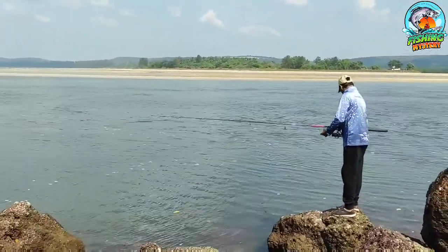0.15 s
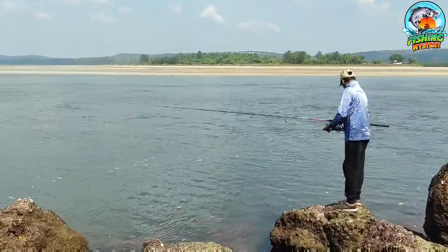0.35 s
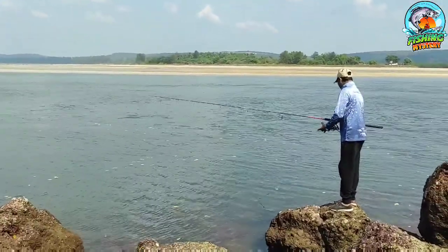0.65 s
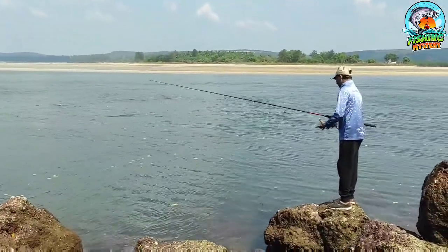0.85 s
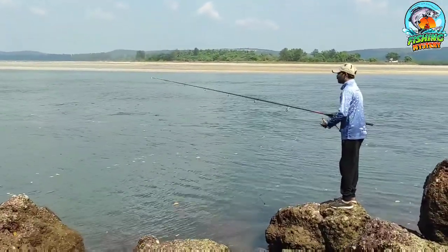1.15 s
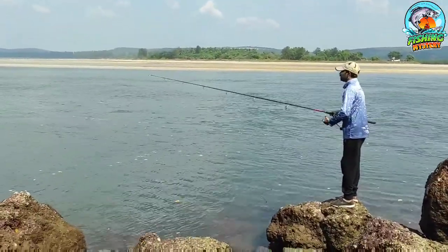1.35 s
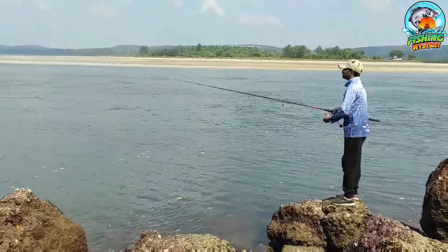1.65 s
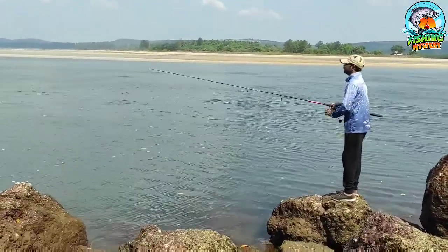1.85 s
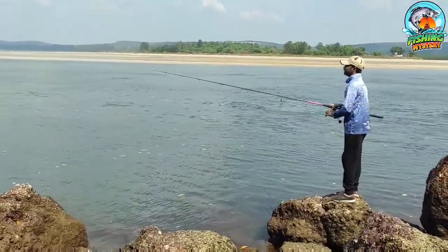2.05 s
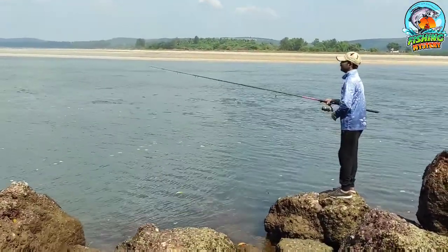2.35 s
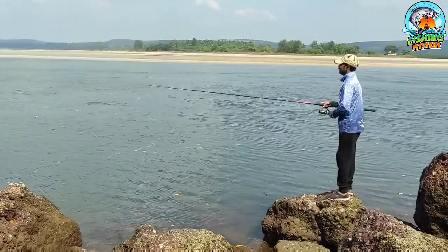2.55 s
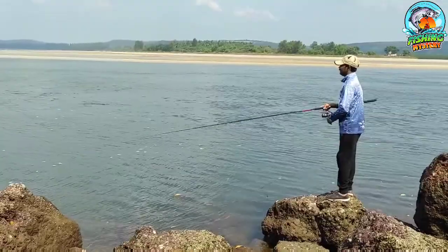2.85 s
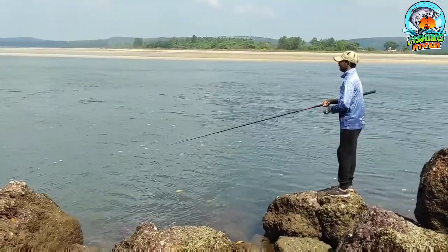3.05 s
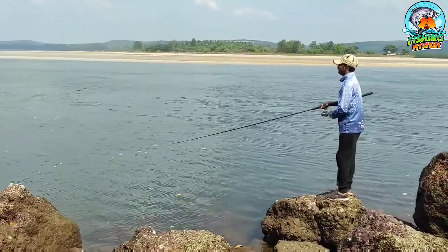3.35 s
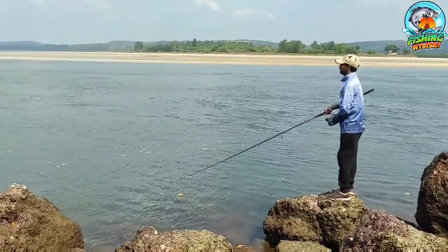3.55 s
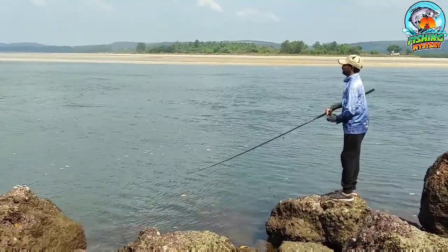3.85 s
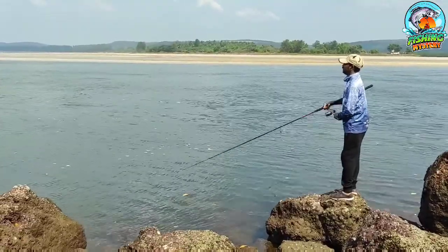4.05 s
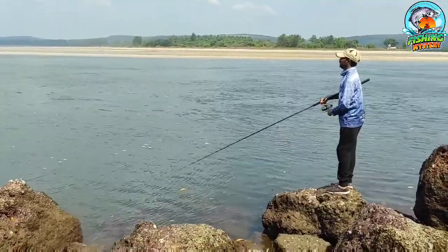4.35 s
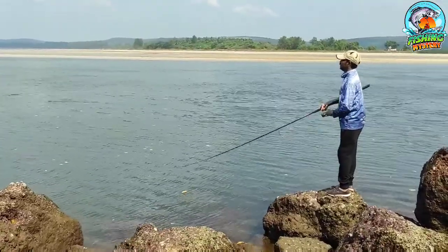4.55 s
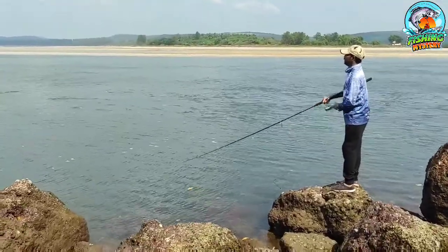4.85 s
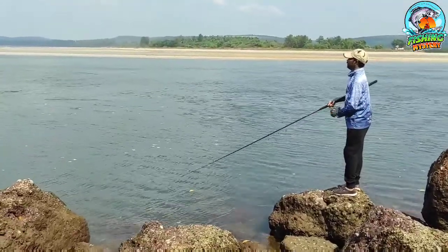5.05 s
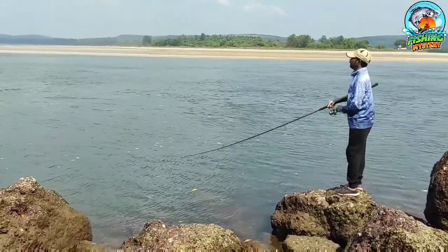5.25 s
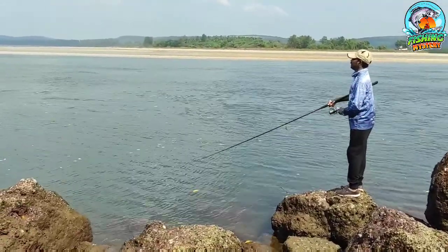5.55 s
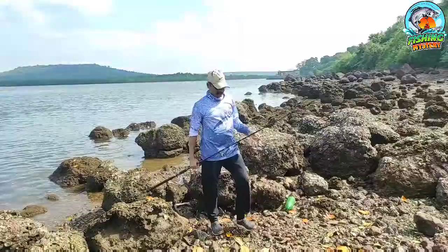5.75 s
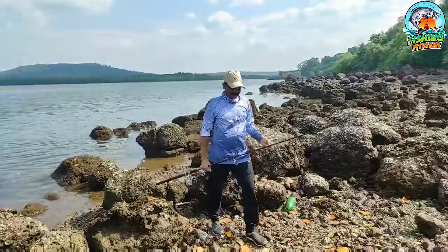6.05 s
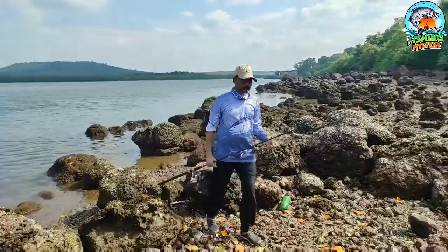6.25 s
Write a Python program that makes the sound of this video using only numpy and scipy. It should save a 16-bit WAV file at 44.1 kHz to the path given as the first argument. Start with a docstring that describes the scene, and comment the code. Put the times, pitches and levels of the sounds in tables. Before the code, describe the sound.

Low wind buffets the microphone on a rocky shore as a bird whistles upward repeatedly; the sound cuts, returns windier, and stones crunch underfoot.

```python
"""Rocky shore in wind: a near bird's rising whistles, most ending in a short pip, echo off the rocks.
A far bird gives falling notes. Birds are gliding sines; tackle clicks are noise bursts ringing in bands.
Wind pushing on the microphone, lapping water and hiss are coloured noise.
Near the end the sound breaks off with sharp ticks and fades back in with stronger wind;
steps then crunch on shingle as bursts of grainy noise."""
import sys
import numpy as np
from scipy import signal
from scipy.fft import rfft, irfft, next_fast_len
from scipy.io import wavfile
from scipy.ndimage import uniform_filter1d, map_coordinates

SR = 44100
rng = np.random.default_rng(int(sys.argv[2]) if len(sys.argv) > 2 else 0)


def unload_wav(signal):
    """Save mono or channel-first audio to the path in sys.argv[1] as 16-bit WAV at rate SR, clipped to [-1, 1]."""
    wavfile.write(
        sys.argv[1],
        SR,
        np.round(np.clip(np.atleast_2d(signal).T, -1, 1) * 32767).astype(np.int16),
    )


N = 282226

# Source levels apply ahead of the break gain. Spectra are relative: each noise is scaled to rms 1.
# Wind on the diaphragm: (time [s], push level before random swing [dB], buffet level [dB])
WIND_LEVELS = [(0, -36, -51), (.12, -34, -56), (.45, -43, -54), (.75, -50, -57), (1.0, -40, -58.5),
               (1.45, -50, -57.5), (1.85, -36, -55.5), (2.03, -46, -55), (2.28, -38, -53.5),
               (2.6, -43, -57), (3.0, -42, -55.5), (3.35, -48, -55), (3.7, -39, -52.5), (4.15, -37, -56.5),
               (4.75, -43, -52), (5.0, -38, -53.5), (5.36, -42, -54.5), (5.51, -32, -53), (5.73, -42, -52),
               (5.83, -38, -50), (5.842, -19, -31), (5.875, -20, -38), (5.91, -17, -34), (5.96, -27, -36),
               (6.015, -19, -35), (6.1, -22, -43), (6.164, -26, -41), (6.274, -20, -42.5), (6.39, -27, -42)]
# Push and buffet spectra: (frequency [Hz], relative density [dB per Hz])
PUSH_SPECTRUM = [(1, 1), (3, 14), (10, 9), (20, 0.5), (30, -29.5), (50, -74), (100, -100)]
BUFFET_SPECTRUM = [(12, -22.5), (22, 4.5), (50, -10.5), (100, -20), (200, -32), (400, -46), (800, -68)]
PUSH_SWING_DB = 2  # scales the random swing

# Water: (time [s], wash level before 2 dB cut [dB], lapping level before swell [dB], fizz level before swell [dB])
WATER_LEVELS = [(0, -61, -72, -80), (.2, -61, -71.5, -83.5), (2, -61, -70, -82), (3.4, -61, -69, -80),
                (4.6, -61, -69.5, -81), (4.91, -59.5, -67.5, -80.5), (5.5, -62, -70, -81),
                (5.73, -61, -68.5, -77), (5.912, -64, -70, -78.5), (6.034, -56.5, -65.5, -75),
                (6.302, -57.5, -63, -71.5), (6.38, -61.5, -64.5, -73)]
# Wash, lapping and fizz spectra: (frequency [Hz], relative density [dB per Hz])
WASH_SPECTRUM = [(100, -7.5), (180, -6), (260, 0.5), (450, 0.5), (700, -1), (1000, -8), (1500, -14),
                 (2500, -63)]
LAPPING_SPECTRUM = [(900, -5.5), (1500, -4), (2100, 2), (3000, -1.5), (3700, -1), (4300, -14.5),
                    (5000, -40.5), (6000, -44)]
FIZZ_SPECTRUM = [(3500, -15.5), (4800, -6.5), (6200, -6.5), (7200, -10.5), (8500, -11.5), (10000, -21),
                 (12000, -43)]

# Microphone self-noise: (frequency [Hz], relative density [dB per Hz])
HISS_SPECTRUM = [(3000, -38), (5000, -8), (8000, -4), (11000, 1.5), (16000, -1)]
# Hiss, louder after the break: (time [s], level [dB])
HISS_LEVELS = [(5.8, -84), (5.95, -81), (6.1, -77.5), (6.4, -79)]

# Clear tackle clicks: (time [s], upper ring peak [dB], upper ring pitch [Hz],
# lower ring before 1.5 dB cut [dB re upper], bright ring before 1.5 dB lift [dB re upper], 30 dB decay [s])
CLEAR_CLICKS = [(0.0364, -47.5, 5740, -5.5, -26, 0.011), (0.043, -55, 6100, 1.5, -26, 0.016),
                (0.5147, -63, 6250, -7, -18, 0.007), (1.7394, -61, 6050, -15, -4, 0.0077),
                (1.7504, -59, 6120, -9, -3, 0.007), (1.761, -62, 5800, -7, -32, 0.0079),
                (1.837, -64, 6170, 7, 4, 0.007), (1.8826, -54.5, 5630, -3, -27, 0.0081),
                (1.9969, -58, 6800, -13, -19, 0.0063), (2.0188, -51.5, 6550, 1, -5, 0.0054),
                (2.1004, -53, 6500, 0, -5, 0.012), (2.2094, -63, 6180, -10, -13, 0.007),
                (2.219, -63, 6200, -10, -6, 0.007), (2.5511, -55, 5400, -15, -29, 0.007),
                (2.72, -56, 7000, -24, -13, 0.0048), (2.9636, -52, 6300, 1, -8, 0.014),
                (2.9735, -52, 6250, 0, -10, 0.014), (3.033, -63, 6120, 5, -13, 0.008),
                (3.5698, -62, 6200, -3, -16, 0.007), (4.4608, -64, 5920, 0, -20, 0.007),
                (4.838, -68, 7000, -10, -5, 0.006), (5.0439, -63, 5900, -8, -11, 0.007),
                (5.128, -66, 6200, -10, -10, 0.007), (5.3223, -64, 6200, -4, -19, 0.0085),
                (5.3672, -57, 5400, -8, -22, 0.0058), (6.1214, -56, 5800, -4, -10, 0.005),
                (6.231, -58, 5700, -8, -10, 0.007), (6.292, -59, 10700, -8, -8, 0.009)]
# Faint clicks, one row each for upper peak [dB], upper pitch [Hz], lower ring [dB], bright ring [dB],
# with the same cut and lift: (mean, standard deviation)
FAINT_CLICK_STATS = [(-72, 2.5), (6200, 280), (-6, 4), (-15, 4)]
FAINT_COUNT, FAINT_UNTIL_S, FAINT_DECAY_S = 24, 5.7, 0.007
CLICK_RISE = 0.2  # rise time constant / decay length
BODY_HZ, BODY_DB = 2150, -7  # dull ring, dB re lower-ring table value

# Near bird's whistles, one list each: (time [s], pitch before end flick [Hz], level before flick and waver [dB])
WHISTLE_GLIDES = [
    [(0.703, 4216, -85), (0.711, 4360, -71), (0.723, 4555, -69), (0.739, 4697, -70), (0.849, 4975, -68),
     (0.901, 5072, -60), (0.955, 5080, -61), (1.003, 5217, -59), (1.01, 5289, -65)],
    [(1.503, 4403, -78), (1.509, 4401, -69), (1.535, 4730, -73), (1.587, 4917, -73), (1.611, 4943, -85),
     (1.659, 5117, -63), (1.695, 5235, -60), (1.735, 5250, -60), (1.775, 5327, -57), (1.782, 5366, -65)],
    [(2.289, 4164, -87), (2.295, 4372, -71), (2.307, 4580, -66), (2.331, 4792, -67), (2.389, 4968, -71),
     (2.435, 5078, -65), (2.517, 5223, -60), (2.549, 5311, -52), (2.557, 5341, -59)],
    [(3.595, 4378, -78), (3.605, 4558, -70), (3.629, 4775, -66), (3.691, 4976, -69), (3.751, 5096, -60),
     (3.839, 5196, -58), (3.879, 5319, -54), (3.886, 5344, -61)],
    [(4.875, 4298, -78), (4.885, 4468, -71), (4.915, 4768, -85), (4.933, 4841, -71), (4.967, 4944, -65),
     (5.011, 5053, -66), (5.161, 5177, -53), (5.168, 5182, -59)],
]
# Closing pips: (time [s], fundamental peak [dB], mid-pip pitch [Hz], overtone [dB re fundamental])
CLOSING_PIPS = [(1.012, -57, 3650, -13), (1.781, -62, 3680, -20), (2.557, -56, 3600, -14),
                (3.886, -54, 3650, -12)]
# Octave of each whistle, at the whistle's peak: (level before waver [dB])
OCTAVE_LEVELS_DB = [-91, -93, -84, -86, -89]
OCTAVE_FOLLOW_DB_PER_DB, OCTAVE_WAVER_DB = 0.35, 3
WHISTLE_WAVER_DB = 1.2
FLICK_HZ, FLICK_S, FLICK_DB = 170, 0.003, 3  # upward snap over the last milliseconds

# Scattering shore, then three rock faces: (delay [s], return level [dB], t60 [s], scattered energy share [0-1])
ROCK_RETURNS = [(.02, -19, .55, 1), (.13, -14.5, .09, .6), (.17, -23, .1, .7), (.25, -29, .08, .55)]
# Each whistle reaches the rocks differently as the bird turns its head: (send gain [dB])
ECHO_SEND_DB = [0, 0, -1, -2, -4]

# Far bird: (time [s], length [s], start pitch [Hz], end pitch [Hz], level before offsets [dB], start offset [dB])
FALLING_NOTES = [(1.515, .185, 4430, 3120, -70.5, -7), (3.15, .165, 4300, 3185, -69.5, -14),
                 (3.603, .028, 6800, 5950, -70, -10), (6.18, .08, 3100, 2290, -66.5, 2)]
SETTLE_POWER, END_OFFSET_DB = 2.05, -3  # how sharply the glide levels off; level offset at the end
FAR_FLUTTER_DB = 1.8  # scale; the long path breaks up the far notes

# Ticks around the break: (time [s], jump size before 4.5 dB lift [dB])
BREAK_TICKS = [(5.7407, -39.5), (5.8537, -40), (5.8584, -63), (5.8642, -43.5), (5.8735, -63), (5.8848, -60),
               (5.8932, -46.5), (5.9033, -53), (5.9119, -46), (5.924, -46)]
# Break and fade back in: (time [s], gain [dB])
BREAK_GAIN = [(5.7405, 3.5), (5.7415, -77), (5.78, -20.5), (5.828, -14), (5.84, -4), (5.9, -3), (5.96, -2)]

# Shingle crunches: (time [s], level before onset rise [dB], 30 dB decay [s], treble gain [dB])
CRUNCHES = [(6.107, -55, 0.02, -8), (6.1345, -43, 0.014, -2), (6.143, -50, 0.015, -4),
            (6.1685, -41.5, 0.025, -3), (6.176, -47, 0.02, -4), (6.185, -51, 0.02, -10),
            (6.196, -53, 0.02, -10), (6.26, -55, 0.03, -8), (6.309, -42, 0.012, 1), (6.319, -55, 0.012, -2),
            (6.351, -46, 0.02, -10), (6.282, -53, 0.012, -6), (6.376, -46, 0.013, -4)]
# Stone grain spectrum: (frequency [Hz], relative density [dB per Hz])
STONE_SPECTRUM = [(180, -34), (300, -4), (700, -3), (1470, -5), (2970, -4), (4320, -17), (5620, -10),
                  (6840, -22), (8740, -20), (15000, -30)]
TREBLE_FROM_HZ = 4300
BAND_LIMIT_HZ = 15450


def amp(db):
    """Amplitude factor from dB."""
    return 10 ** (np.asarray(db) / 20)


def unit(x):
    """x scaled to rms 1."""
    return x / np.sqrt(np.mean(x ** 2) + 1e-20)


def curves(rows):
    """One value per sample for each column after the time."""
    time_s, *columns = np.transpose(rows)
    return [np.interp(np.arange(N) / SR, time_s, column) for column in columns]


def wobble(rate_hz):
    """Smooth random curve with rate_hz knots a second."""
    knots = rng.standard_normal(int(N * rate_hz / SR) + 4)
    return map_coordinates(knots, [np.arange(N) * rate_hz / SR])


def filtered(x, response):
    """x through a response given as a function of Hz."""
    size = next_fast_len(len(x) + 8192)
    return irfft(rfft(x, size) * response(np.fft.rfftfreq(size, 1 / SR)), size)[:len(x)]


def coloured(x, spectrum):
    """x shaped by a spectrum on a log-Hz axis, silent above its last point, rms 1."""
    f_hz, db = np.transpose(spectrum)

    def response(hz):
        gain_db = np.interp(np.log(hz + 0.17), np.log(f_hz), db)
        return amp(gain_db) * (hz < f_hz[-1])

    return unit(filtered(x, response))


def patchy(depth_db):
    """White noise with patches of random gain in time and frequency."""
    bins = signal.stft(rng.standard_normal(N + 512), nperseg=512)[2]
    field = uniform_filter1d(rng.standard_normal(bins.shape), 6, 0)
    field = uniform_filter1d(field, 10, 1)
    return signal.istft(bins * amp(depth_db * unit(field)), nperseg=512)[1][:N]


def add(out, time_s, x):
    """Mix x into out from time_s."""
    part = out[round(time_s * SR):][:len(x)]
    part += x[:len(part)]


def wind():
    """Slow pressure pushes and faster lumpy buffeting on the diaphragm."""
    push_db, buffet_db = curves(WIND_LEVELS)
    push = coloured(rng.standard_normal(N), PUSH_SPECTRUM)
    push = unit(np.tanh(0.57 * push))  # pushes flatten as the diaphragm stiffens
    lumps = amp(0.9 * wobble(14))
    buffet = unit(lumps * coloured(rng.standard_normal(N), BUFFET_SPECTRUM))
    return amp(push_db + PUSH_SWING_DB * wobble(7)) * push + amp(buffet_db) * buffet


def bubble_pops():
    """Bursting bubbles: short decaying sines of random size and pitch, in clumps."""
    draws, t = rng.random((1500, 3)), np.arange(256) / SR
    size = amp(-4 * np.log(1.03 - draws[:, 1:2]))
    hz = 5600 + 1400 * draws[:, 2:]
    envelope = amp(-60 * t / 0.015) * np.hanning(len(t)) ** 0.5
    pops = size * np.sin(2 * np.pi * hz * t) * envelope
    where = (draws[:, :1] * N).astype(int) + np.arange(len(t))
    return amp(4 * wobble(8)) * np.bincount(where.ravel(), pops.ravel(), N)[:N]


def water():
    """Far wash, nearer lapping and bubble fizz; lapping and fizz share a random swell."""
    wash_db, lapping_db, fizz_db = curves(WATER_LEVELS)
    swell_db = 0.78 * wobble(6)
    wash = coloured(patchy(depth_db=1), WASH_SPECTRUM)
    lapping = coloured(patchy(depth_db=1), LAPPING_SPECTRUM)
    fizz = coloured(patchy(depth_db=1), FIZZ_SPECTRUM) + amp(-7) * unit(bubble_pops())
    return (amp(wash_db - 2) * wash
            + amp(lapping_db + swell_db) * lapping
            + amp(fizz_db + swell_db) * fizz)


def microphone_hiss():
    """Microphone self-noise: coloured noise along a level curve."""
    return amp(curves(HISS_LEVELS)[0]) * coloured(rng.standard_normal(N), HISS_SPECTRUM)


def ring(burst, centre_hz, width_hz):
    """Burst through a triple resonance, peak 1."""
    def response(hz):
        damping = 1j * hz * width_hz
        return (damping / (centre_hz ** 2 - hz ** 2 + damping)) ** 3

    sound = filtered(burst, response)
    return sound / abs(sound).max()


def tackle():
    """Clicks: rough noise bursts ringing in four narrow bands of the small parts."""
    out, t = np.zeros(N), np.arange(1024) / SR
    mean, spread = np.transpose(FAINT_CLICK_STATS)
    faint = [(rng.uniform(0, FAINT_UNTIL_S), *rng.normal(mean, spread), FAINT_DECAY_S)
             for _ in range(FAINT_COUNT)]
    for time_s, peak_db, upper_hz, lower_db, bright_db, decay_s in CLEAR_CLICKS + faint:
        rise = 1 - np.exp(-t / (CLICK_RISE * decay_s))
        burst = rng.standard_normal(len(t)) * amp(-30 * t / decay_s) * rise
        upper_width_hz = np.clip(800 + 70 * (peak_db + 65), 500, 3000)  # faint clicks ring narrower
        click = ring(burst, upper_hz, upper_width_hz)
        click += amp(lower_db - 1.5) * ring(burst, 3400, 1500)
        click += amp(bright_db + 1.5) * ring(burst, 8600, 3000)
        click += amp(lower_db + BODY_DB) * ring(burst, BODY_HZ, 900)
        add(out, time_s, amp(peak_db) * click)
    return out


def note(t, hz, levels_db):
    """Gliding sine with one harmonic per level and short end ramps."""
    phase = 2 * np.pi * np.cumsum(hz) / SR
    ends = np.clip(np.minimum(t, t[-1] - t) / 0.0029, 0, 1)
    return ends * sum(amp(db) * np.sin((k + 1) * phase) for k, db in enumerate(levels_db))


def whistle(rows, octave_db):
    """Whistle along its pitch and level curve, with a faint octave that comes and goes."""
    time_s, hz, db = np.transpose(rows)
    t = np.arange(0, time_s[-1] - time_s[0], 1 / SR)
    flick = np.exp((t - t[-1]) / FLICK_S)
    glide_hz = np.interp(t + time_s[0], time_s, hz)
    hz = uniform_filter1d(glide_hz, size=301, mode="nearest") + FLICK_HZ * flick
    db = np.interp(t + time_s[0], time_s, db) + FLICK_DB * flick
    db = db + WHISTLE_WAVER_DB * wobble(60)[:len(t)]
    octave_db = octave_db + OCTAVE_FOLLOW_DB_PER_DB * (db - db.max())
    octave_db = octave_db + OCTAVE_WAVER_DB * wobble(25)[-len(t):]
    return note(t, hz, [db, octave_db])


def pip(peak_db, mid_hz, overtone_db):
    """Short steeply dropping tone with an octave overtone."""
    t = np.arange(round(0.0074 * SR)) / SR
    phase = 2 * np.pi * mid_hz * t * (1.11 - 15 * t)
    envelope = np.sin(np.pi * t / t[-1]) ** 2
    return amp(peak_db) * envelope * (np.sin(phase) + amp(overtone_db) * np.sin(2 * phase))


def rock_echo(sent):
    """Each uneven surface returns a clear and a smeared copy."""
    rocks, t = np.zeros(SR), np.arange(SR // 2) / SR
    for delay_s, db, t60_s, share in ROCK_RETURNS:
        smear = rng.standard_normal(len(t)) * amp(-60 * t / t60_s)
        smear /= np.linalg.norm(smear)
        add(rocks, delay_s, amp(db) * (np.sqrt(share) * smear + np.sqrt(1 - share) * (t == 0)))
    flutter_db = 4 * wobble(250) + 1.2 * wobble(50)  # moving air makes far paths flutter
    return amp(flutter_db) * signal.fftconvolve(sent, rocks)[:N]


def near_bird():
    """Whistles with rock echoes, and dry closing pips."""
    near, sent = np.zeros((2, N))
    for rows, octave_db, send_db in zip(WHISTLE_GLIDES, OCTAVE_LEVELS_DB, ECHO_SEND_DB):
        sound = whistle(rows, octave_db)
        add(near, rows[0][0], sound)
        add(sent, rows[0][0], amp(send_db) * sound)
    for time_s, *settings in CLOSING_PIPS:
        add(near, time_s, pip(*settings))
    return near + rock_echo(sent)


def falling_note(length_s, start_hz, end_hz, db, start_offset_db):
    """Sine whose pitch drops fast and settles, with level offsets at start and end."""
    t = np.arange(round(length_s * SR)) / SR
    u = t / length_s
    hz = end_hz + (start_hz - end_hz) * (1 - u) ** SETTLE_POWER
    return note(t, hz, [db + start_offset_db * (1 - u) ** 2 + END_OFFSET_DB * u ** 8])


def far_bird():
    """Falling notes whose level flutters over the long path."""
    far = np.zeros(N)
    for time_s, *settings in FALLING_NOTES:
        add(far, time_s, falling_note(*settings))
    return far * amp(FAR_FLUTTER_DB * (wobble(70) + 2 * wobble(300)))


def ticks():
    """Sudden small jumps of the waveform that sag back exponentially."""
    out, t = np.zeros(N), np.arange(SR // 20) / SR
    for time_s, db in BREAK_TICKS:
        add(out, time_s, -amp(db + 4.5) * np.exp(-t / 0.0023))
    return out


def shingle():
    """Stones shift under a boot: short bursts of clumped grains, some duller than others."""
    low_gain, high_gain = np.zeros((2, N))
    t = np.arange(SR // 10) / SR
    for time_s, db, decay_s, treble_db in CRUNCHES:
        burst = amp(db - 30 * t / decay_s) * (1 - np.exp(-t / 0.001))
        add(low_gain, time_s, burst)
        add(high_gain, time_s, amp(treble_db) * burst)
    grains = coloured(rng.standard_normal(N) * amp(2.5 * wobble(640)), STONE_SPECTRUM)
    low = filtered(grains, lambda hz: 1 / (1 + (hz / TREBLE_FROM_HZ) ** 8))
    return low_gain * low + high_gain * (grains - low)


def scene():
    """All sources, summed to one channel."""
    return (wind() + water() + tackle() + near_bird() + far_bird() + shingle())[None]


def record(dry):
    """Add microphone hiss, apply the break gain, add ticks and cut all above the band limit."""
    broken = (dry[0] + microphone_hiss()) * amp(curves(BREAK_GAIN)[0])
    return filtered(broken + ticks(), lambda hz: hz < BAND_LIMIT_HZ)[None]


dry = scene()
out = record(dry)
unload_wav(out)
```